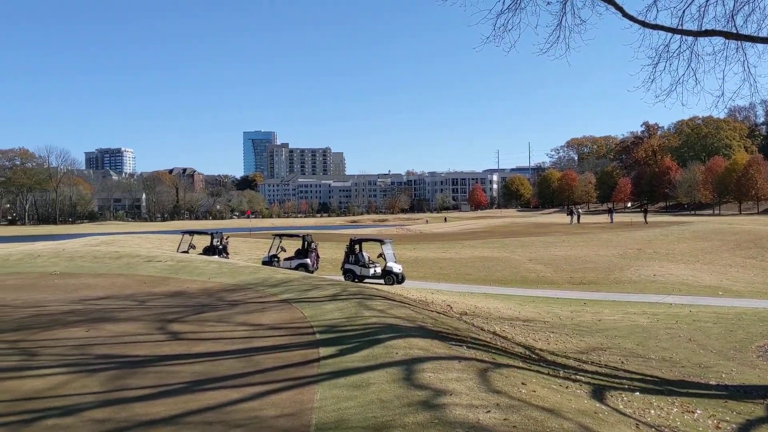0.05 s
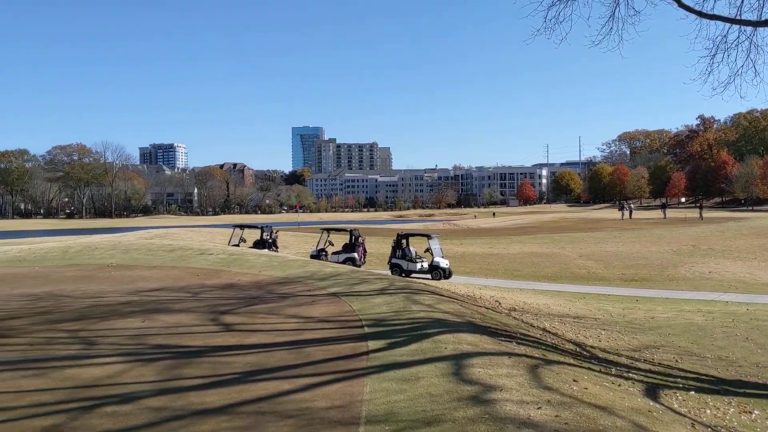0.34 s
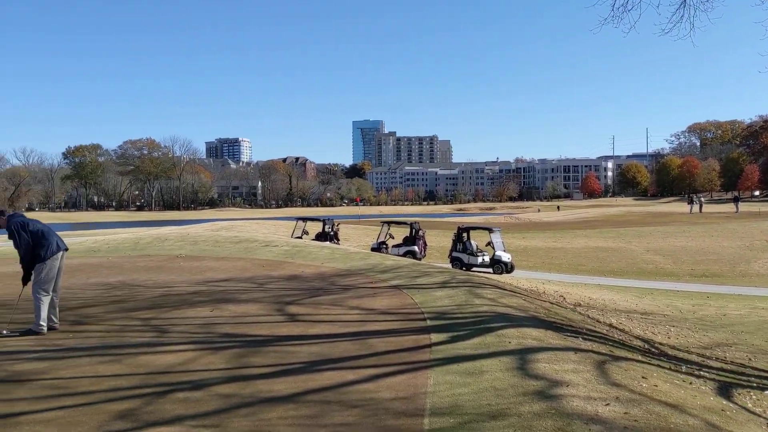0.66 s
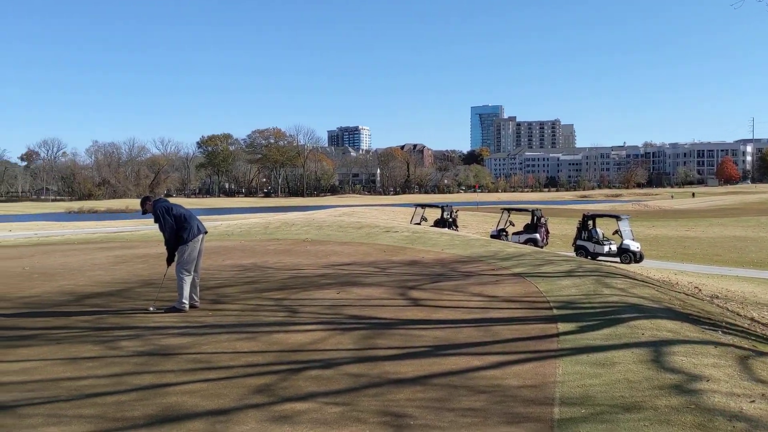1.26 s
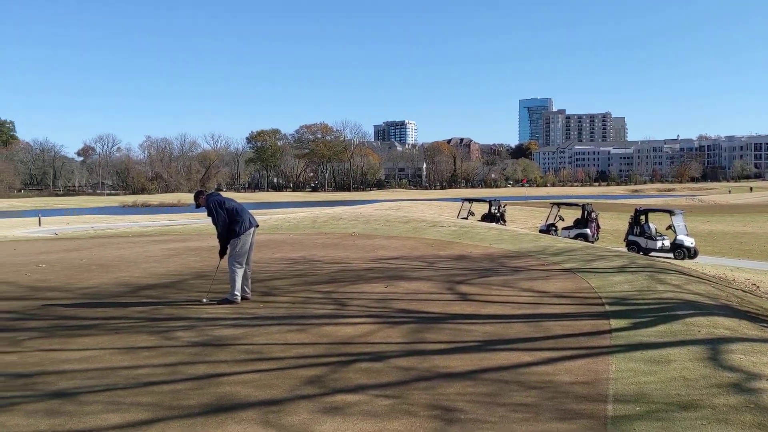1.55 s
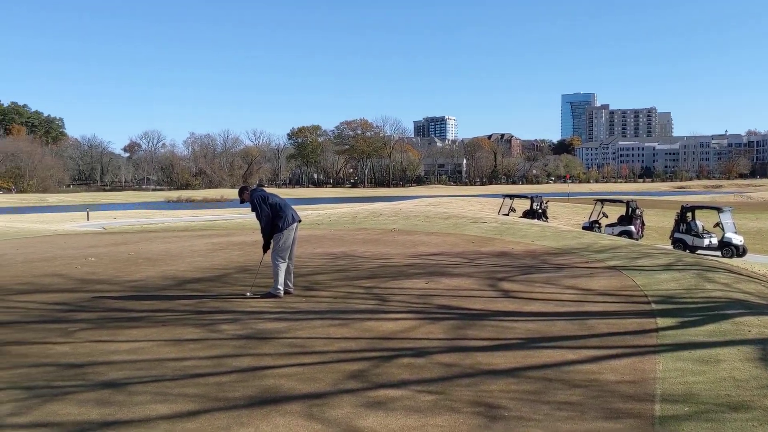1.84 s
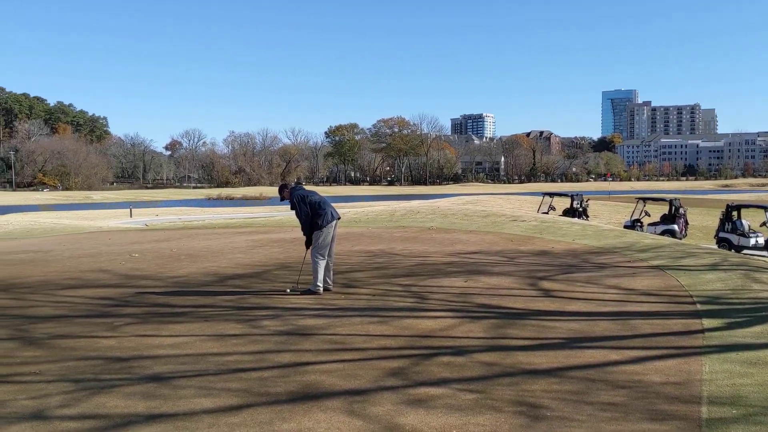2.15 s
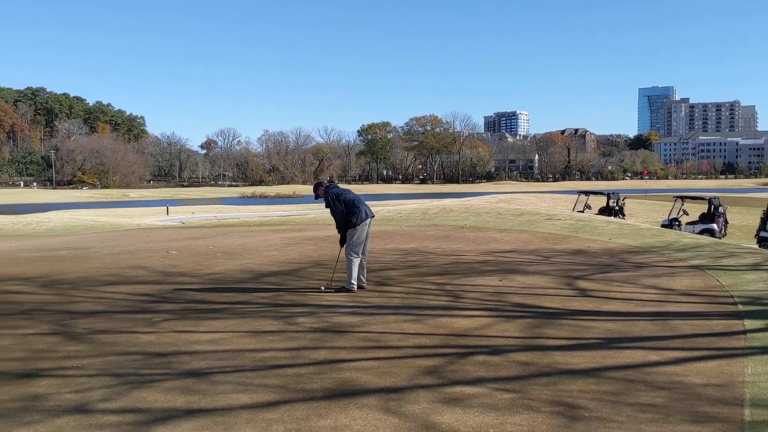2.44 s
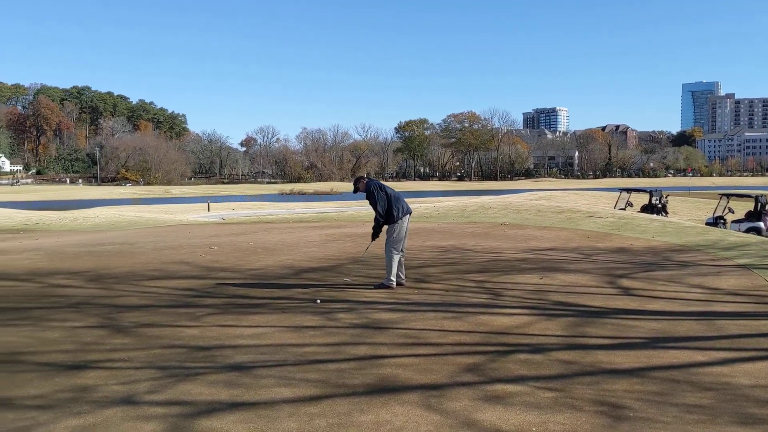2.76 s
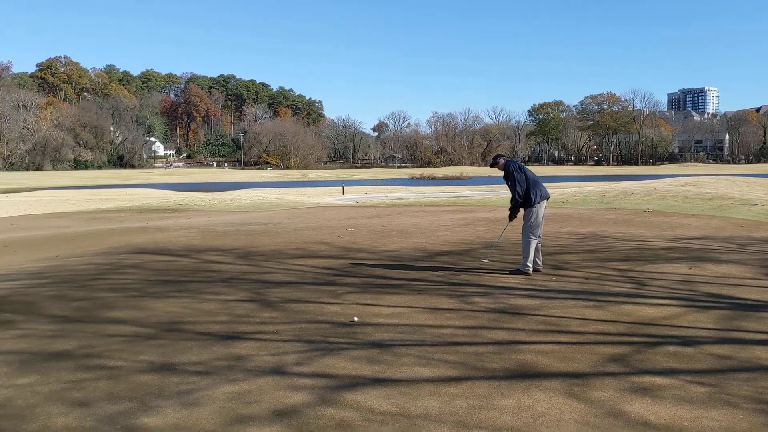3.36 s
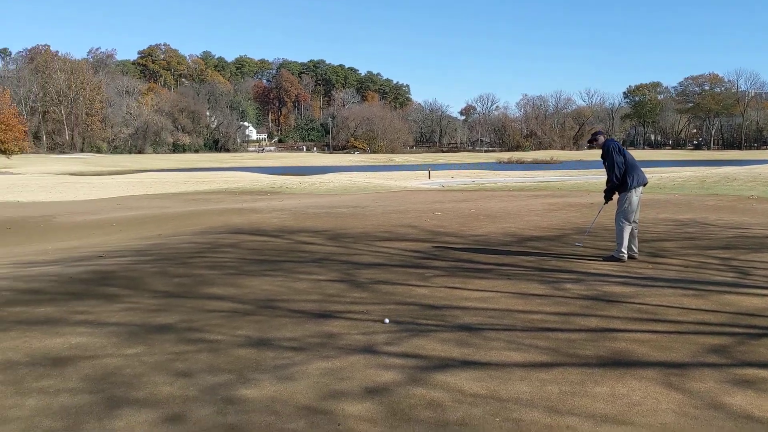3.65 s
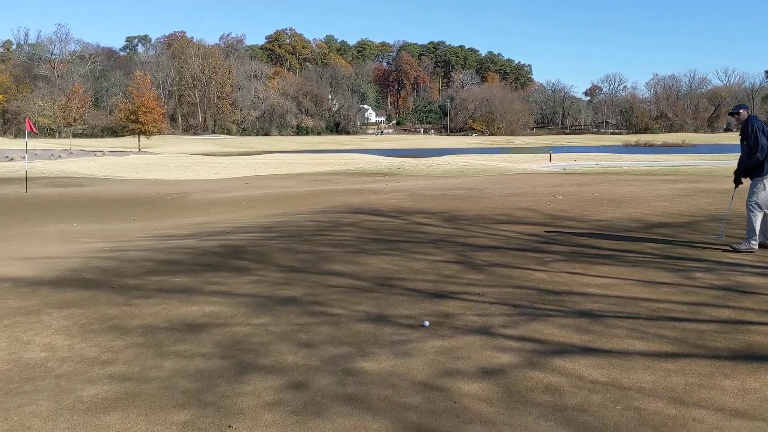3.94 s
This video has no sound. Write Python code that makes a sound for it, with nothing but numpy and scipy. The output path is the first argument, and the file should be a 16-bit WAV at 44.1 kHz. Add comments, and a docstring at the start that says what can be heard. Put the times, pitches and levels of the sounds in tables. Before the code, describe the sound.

A golf putt makes one sharp, dry click at about 2.6 seconds. Wind buffets the microphone, strongest at the very start, with lighter puffs around 1 and 2 seconds over a low rumble. Very faint birds call and whistle in the first two seconds. A few faint ticks follow the putt from 3 seconds on. Distant traffic, a low engine hum and thin hiss continue throughout.

```python
"""A putt on a breezy green

A putter taps a golf ball: one dry click, doubled by its reflection off the turf. Wind puffs buffet
the microphone over a low rumble. Far birds whistle, call and trill among faint ticks and rustles.
Underneath sits a bed of distant engine hum, traffic wash and thin hiss."""
import sys
import numpy as np
from scipy import signal
from scipy.fft import rfft, irfft, next_fast_len
from scipy.io import wavfile
from scipy.ndimage import map_coordinates

SR = 44100
rng = np.random.default_rng(int(sys.argv[2]) if len(sys.argv) > 2 else 0)


def bounce(signal):
    """Save signal as a 16-bit WAV file at the path given by the first command-line argument."""
    frames = np.transpose(np.atleast_2d(signal))
    limited = np.clip(frames, -1, 1)
    pcm = np.round(limited * 32767).astype(np.int16)
    wavfile.write(sys.argv[1], SR, pcm)


N = 176400

# ring of club head and ball: f/Hz, relative level/dB, t60/s
CLICK_MODES = [(640, -7.5, 0.0035), (1320, -3, 0.0029), (2850, -10.5, 0.009), (3640, -20, 0.016),
               (3915, -7, 0.0059), (4290, -15, .006), (5225, -18.5, .009), (6000, -16, 0.0059),
               (9670, -14, 0.0048), (10300, -23, 0.0044), (12700, -19, .0038), (14900, -18, .003)]
# puffs on the microphone ports: t/s, level/dB, half length/s, left over right/dB
WIND_PUFFS = [(-0.015, -26.5, 0.036, -2), (0.102, -34.5, 0.037, -2.5), (0.222, -40, 0.024, -1.5),
              (0.316, -44, 0.055, -2), (.69, -52, 0.055, 8), (0.923, -41, 0.028, 10),
              (1.027, -41, 0.018, 6.5), (1.433, -44, .025, 4), (1.654, -38, 0.022, 2),
              (1.852, -35, 0.0078, 0.5), (1.925, -48, .015, 2), (2.043, -40.5, 0.012, -1),
              (2.349, -43, 0.015, -6), (3.724, -43.5, 0.02, 8.5)]
# tone of the puffs: f/Hz, relative level/dB
PUFF_SPECTRUM = [(12, -13.5), (35, 3), (70, -5), (120, -0.5), (200, -9.5), (320, -21.5), (500, -31.5),
                 (1000, -45), (3000, -88)]
# stereo image of the puffs: f/Hz, left-right correlation
PUFF_CORRELATION = [(40, 0.23), (150, -0.44)]
# rise and fall of the breeze: t/s, level/dB
BREEZE_ENVELOPE = [(0, -46.5), (.36, -47), (.5, -52), (.95, -45), (1.15, -54.5), (1.52, -54.5),
                   (1.65, -46.5), (2.35, -46.5), (2.6, -53), (3.2, -50.5), (3.45, -48.5), (3.6, -50),
                   (3.74, -48), (4, -46.5)]
# tone of the breeze: f/Hz, relative level/dB
BREEZE_SPECTRUM = [(12, -11), (28, -1), (55, -4), (85, -8), (120, -11.5), (170, -18), (250, -26.5),
                   (400, -34.5), (900, -49), (3000, -83)]
# stereo image of breeze, traffic and hiss: f/Hz, left-right correlation
BED_CORRELATION = [(40, 0.78), (130, 0.75), (260, 0.29), (500, 0.22), (1000, 0.44), (2000, -0.21),
                   (8000, 0.03)]
# contour of the bird's whistle: t/s, f/Hz, relative level/dB
WHISTLE_CONTOUR = [(.77, 2990, -88), (.784, 3220, -72), (.797, 3380, -70.5), (.815, 3405, -73.5),
                   (.846, 3280, -67.5), (.885, 3170, -75), (.95, 2980, -84), (1.02, 2870, -85),
                   (1.06, 2820, -105)]
# very distant bird calls: t/s, level/dB, half length/s, f/Hz, slide/(Hz/s)
FAR_CALLS = [(0.038, -71.5, 0.045, 1543, 94), (0.579, -69, 0.032, 1514, -2500),
             (0.779, -72, 0.071, 1567, 798), (1.632, -72, .025, 1560, 0)]
# faint ticks: t/s, level/dB, f/Hz, t60/s
FAINT_TICKS = [(0.611, -60, 14000, .02), (1.96, -74, 10000, .04), (2.094, -69, 13000, .02),
               (3.008, -66.5, 3000, .025), (3.066, -58, 3080, 0.02), (3.27, -59.5, 1880, 0.084),
               (3.27, -66.5, 3980, .03), (3.524, -64, 3380, 0.018), (3.548, -60, 2930, 0.018),
               (3.62, -68.5, 2770, .06), (3.888, -62, 3520, 0.014)]
# airy rustles: t/s, level/dB, half length/s, f/Hz, half width/octaves
AIRY_RUSTLES = [(3.675, -72, .04, 13500, .55), (3.826, -70, .004, 13000, .6), (3.95, -75, .03, 10000, .7),
                (3.95, -74, .025, 15200, .08)]
# contour of the distant engine's hum: t/s, f/Hz, level/dB
ENGINE_CONTOUR = [(0, 139, -61.5), (1.3, 139, -65.5), (1.65, 139, -60.5), (2.3, 140, -53.5),
                  (2.75, 140, -61), (3.2, 140, -52), (3.7, 141, -57), (4, 143, -55.5)]
# far machine tones: f/Hz, level/dB, width/Hz
MACHINE_TONES = [(126, -61, 4), (214, -70, 6), (277, -74, 5), (744, -75, 8), (2352, -91, 12)]
# tone of the far traffic: f/Hz, relative level/dB
TRAFFIC_SPECTRUM = [(40, 3), (130, 1), (200, 4.5), (360, -1), (600, 1), (880, -1.5), (1100, -6.5),
                    (1350, -13), (1600, -10.5), (1950, -18.5), (2600, -21.5), (5000, -35)]
# tone of the hiss: f/Hz, relative level/dB
HISS_SPECTRUM = [(1000, 8), (2500, -5), (3400, 7.5), (4200, 5.5), (4900, 0), (5750, 7.5), (6600, -4),
                 (7500, 1.5), (8500, -7.5), (9600, -1), (10900, -13), (11900, -2), (13000, -5.5),
                 (13700, -4), (15500, -6)]
# lean of the hiss: f/Hz, left over right/dB
HISS_BALANCE = [(2000, -0.5), (5000, 6), (8000, 11), (13000, 16.5)]


def putt(at_s=2.648, push_hz=960, turf_delay_s=.001724, turf_db=-4.8):
    """The ball's sudden start sends out a pressure pulse; head and ball ring; the turf reflects it all."""
    t = np.arange(N) / SR - at_s
    spread = (np.pi * push_hz * t) ** 2
    push = (1 - 2 * spread) * np.exp(-spread)
    crack = amp(-3.5) * bump(at_s, half_s=.000024)  # the hard first contact
    ring = sum(amp(db) * fade(t, t60) * np.sin(2 * np.pi * hz * t) for hz, db, t60 in CLICK_MODES)
    direct = amp(-36) * (push + crack + ring)
    click = filtered(direct, lambda hz: 1 + amp(turf_db) * np.exp(-2j * np.pi * hz * turf_delay_s))
    scatter = amp(-19) * echo(click, t60=.025)
    return pan(left_db=5.5) * (click + scatter)


def wind(flutter_db=1):
    """A rumble largely shared by both microphone ports, and short puffs that hit each differently."""
    level_db, = curves(BREEZE_ENVELOPE)
    rumble = amp(level_db + flutter_db * wobble(12)) * stereo_noise(BREEZE_SPECTRUM, BED_CORRELATION)
    puffs = sum(amp(db) * pan(left_db) * bump(s, half) for s, db, half, left_db in WIND_PUFFS)
    return rumble + puffs * stereo_noise(PUFF_SPECTRUM, PUFF_CORRELATION)


def bird_whistle(boost_db=3.5):
    """A whistle on the left that flicks up and slides down, echoing from the trees."""
    hz, level_db = curves(WHISTLE_CONTOUR)
    t = np.arange(N) / SR
    gate = (t > WHISTLE_CONTOUR[0][0]) & (t < WHISTLE_CONTOUR[-1][0])
    whistle = gate * amp(level_db + boost_db) * tone(hz + 9 * wobble(150))
    return pan(left_db=21) * (whistle + amp(-10) * echo(whistle, t60=.35))


def bird_calls():
    """Short, very distant calls, blurred by a fast jitter in pitch."""
    t = np.arange(N) / SR
    calls = sum(amp(db) * bump(s, half) * tone(hz + slide * (t - s) + 25 * wobble(120))
                for s, db, half, hz, slide in FAR_CALLS)
    return pan(left_db=6) * calls


def bird_trill(at_s=2.513, step_s=.0187):
    """A thin, high trill: seven quick pips of narrow noise."""
    pips = sum(bump(at_s + k * step_s, half_s=.0025) for k in range(7))
    return pan(left_db=6) * amp(-74) * pips * band_noise(7650, octaves=.12)


def ticks():
    """Tiny noise bursts with a hard attack and a fast decay."""
    t = np.arange(N) / SR
    bursts = sum(amp(db) * fade(t - s, t60) * band_noise(hz, octaves=.25)
                 for s, db, hz, t60 in FAINT_TICKS)
    return pan(left_db=2.5) * bursts


def rustles():
    """Soft swells of airy treble after the putt."""
    swells = sum(amp(db) * bump(s, half) * band_noise(hz, octaves)
                 for s, db, half, hz, octaves in AIRY_RUSTLES)
    return pan(left_db=9) * swells


def engines():
    """One low hum and fainter machine tones, all wavering on their way through the air."""
    t = np.arange(N) / SR
    hum_hz, level_db = curves(ENGINE_CONTOUR)
    hum = amp(level_db + .5 * wobble(7)) * tone(hum_hz + .82 * wobble(8))
    drones = np.zeros(N)
    for hz, db, width in MACHINE_TONES:
        waver = wobble(width) + 1j * wobble(width)  # drifts in both level and phase
        drones += amp(db) * unit(np.real(waver * np.exp(2j * np.pi * hz * t)))
    return pan(left_db=1.2) * hum + pan(left_db=5.5) * drones


def traffic(level_db=-56, swell_db=.5):
    """The dull wash of far traffic, swelling slightly."""
    swell = amp(level_db + swell_db * wobble(3.234))
    return pan(left_db=4.5) * swell * stereo_noise(TRAFFIC_SPECTRUM, BED_CORRELATION)


def hiss(level_db=-73.5):
    """Steady hiss of air and microphone, leaning left in the treble."""
    noise = stereo_noise(HISS_SPECTRUM, BED_CORRELATION)
    leaning = filtered(noise, lambda hz: amp(np.outer([.5, -.5], along(HISS_BALANCE, hz))))
    return amp(level_db) * unit(leaning)


def amp(db):
    """Decibels to gain."""
    return 10 ** (np.asarray(db) / 20)


def unit(x):
    """Scale to rms 1."""
    return x / np.sqrt(np.mean(x ** 2) + 1e-20)


def pan(left_db):
    """Channel gains, left over right by left_db."""
    return unit(amp(np.array([[left_db], [-left_db]]) / 2))


def along(points, hz):
    """Interpolate breakpoints on a log frequency axis."""
    point_hz, values = np.transpose(points)
    return np.interp(np.log(hz + 1), np.log(point_hz + 1), values)


def curves(rows):
    """One automation curve for each column after the time."""
    times, *columns = np.transpose(rows)
    return [np.interp(np.arange(N) / SR, times, column) for column in columns]


def wobble(rate):
    """A smooth random curve, rate knots a second."""
    knots = rng.standard_normal(N // 100)
    return map_coordinates(knots, [np.arange(N) * rate / SR + 2], mode="mirror")


def bump(centre_s, half_s):
    """A bell-shaped swell, down to 1/e at half_s either side."""
    return np.exp(-((np.arange(N) / SR - centre_s) / half_s) ** 2)


def fade(t, t60):
    """Exponential decay that starts at t = 0."""
    return (t >= 0) * np.exp(-np.log(1000) * np.abs(t) / t60)


def tone(hz):
    """A sine of rms 1 that follows a pitch curve."""
    return unit(np.sin(2 * np.pi * np.cumsum(hz) / SR))


def filtered(x, response):
    """Shape x with a frequency response."""
    size = next_fast_len(N + SR // 2)
    return irfft(rfft(x, size) * response(np.fft.rfftfreq(size, 1 / SR)), size)[..., :N]


def stereo_noise(spectrum, correlation):
    """Noise of rms 1 with a given spectrum and left-right correlation."""
    def mid_side_gains(hz):
        angle = np.arccos(np.clip(along(correlation, hz), -1, 1)) / 2
        return amp(along(spectrum, hz)) * [np.cos(angle), np.sin(angle)]
    mid, side = filtered(rng.standard_normal((2, N)), mid_side_gains)
    return unit(np.array([mid + side, mid - side]))


def band_noise(centre_hz, octaves):
    """Stereo noise of rms 1 around one frequency."""
    white = rng.standard_normal((2, N))
    return unit(filtered(white, lambda hz: 1 / (1 + (np.log2((hz + 1) / centre_hz) / octaves) ** 2)))


def echo(x, t60):
    """The diffuse stereo reverb of x, at about unity gain."""
    tail = rng.standard_normal((2, SR // 2)) * fade(np.arange(SR // 2) / SR, t60)
    return signal.fftconvolve(x[None], tail / np.linalg.norm(tail[0]), axes=1)[:, :N]


def scene():
    """The full mix, heard from the edge of the green."""
    foreground = putt() + wind()
    bed = traffic() + hiss() + engines()
    birds = bird_whistle() + bird_calls() + bird_trill()
    return foreground + bed + birds + ticks() + rustles()


def record(dry):
    """A brick-wall low-pass trims the very top."""
    return filtered(dry, lambda hz: hz < 15750)


dry = scene()
out = record(dry)
bounce(out)
```